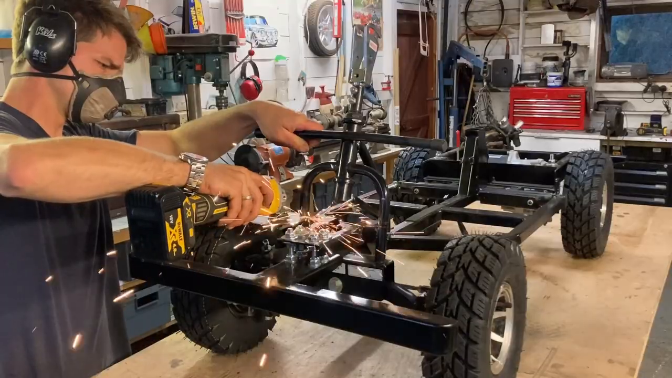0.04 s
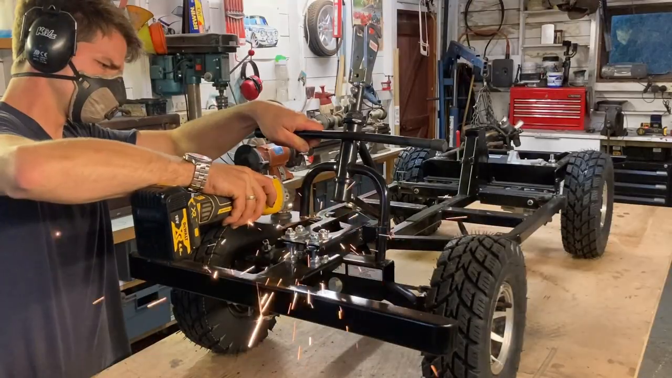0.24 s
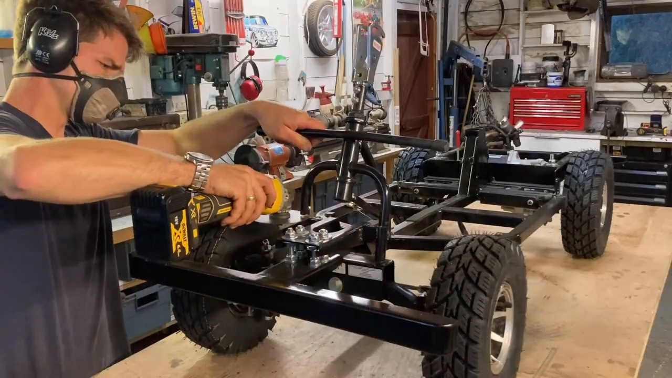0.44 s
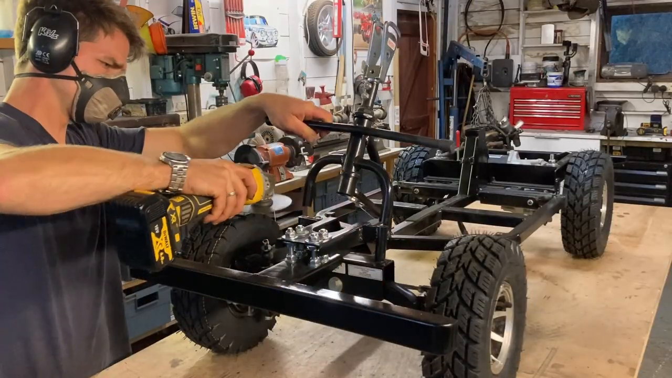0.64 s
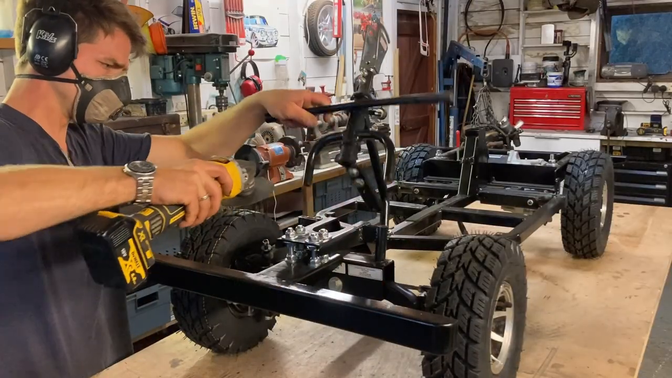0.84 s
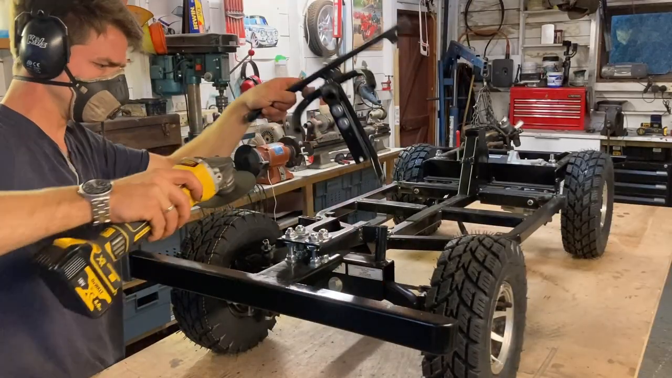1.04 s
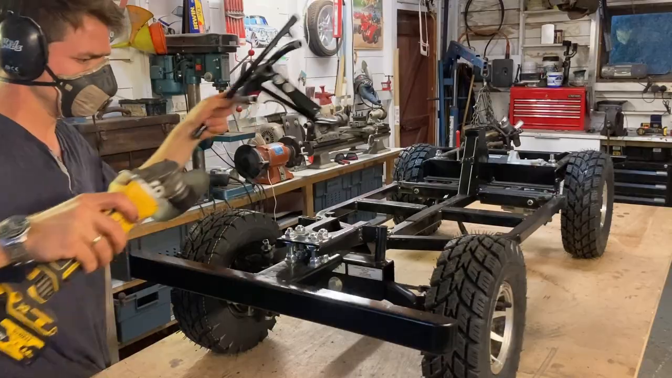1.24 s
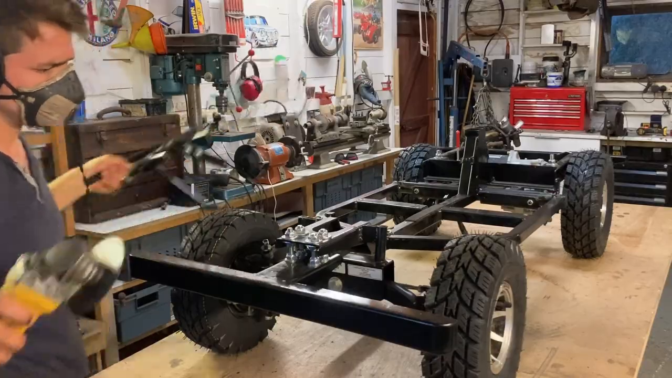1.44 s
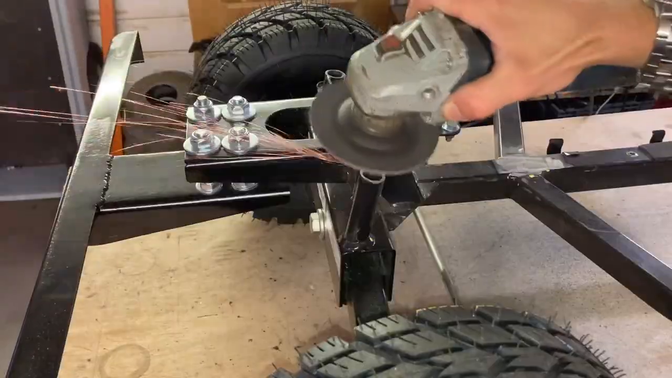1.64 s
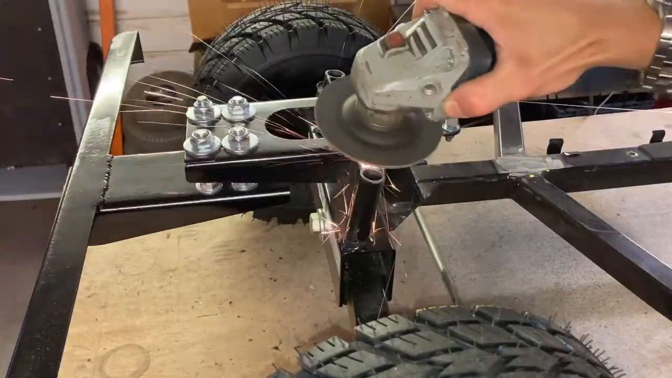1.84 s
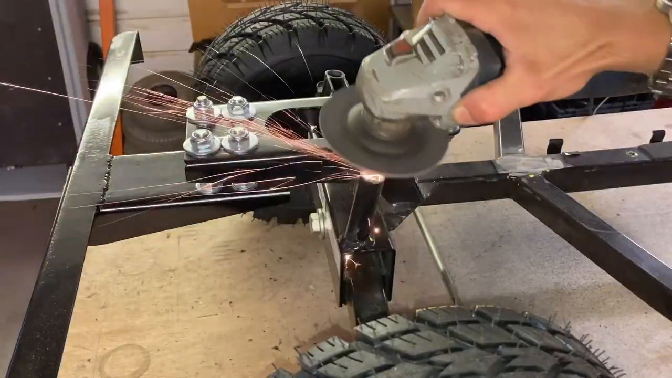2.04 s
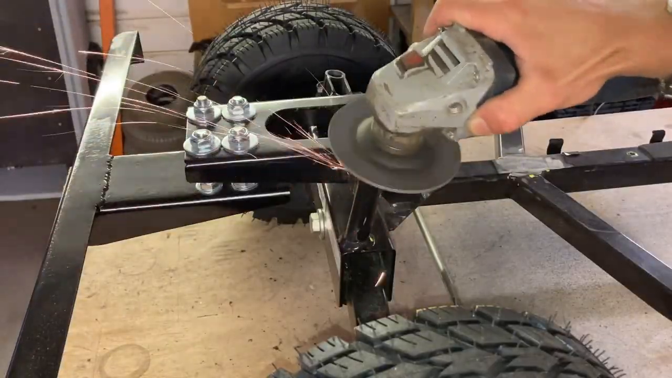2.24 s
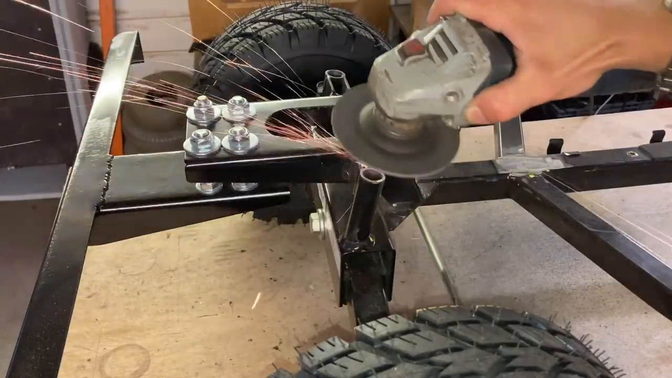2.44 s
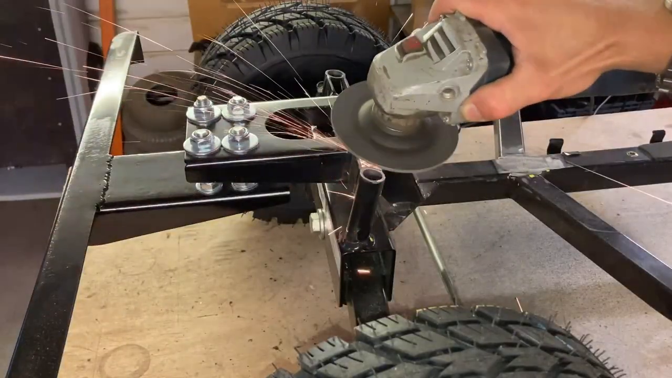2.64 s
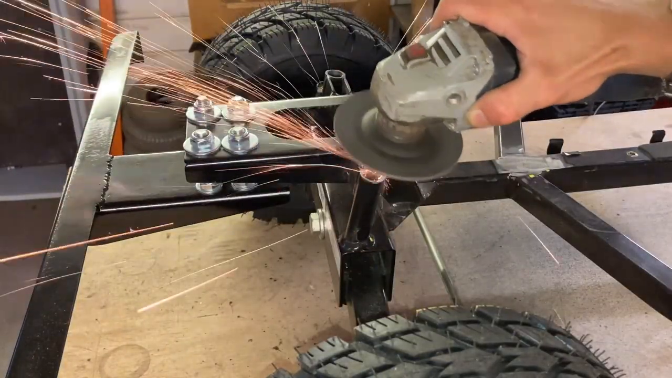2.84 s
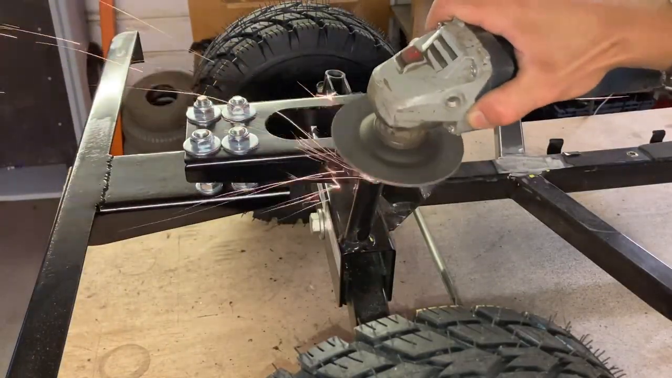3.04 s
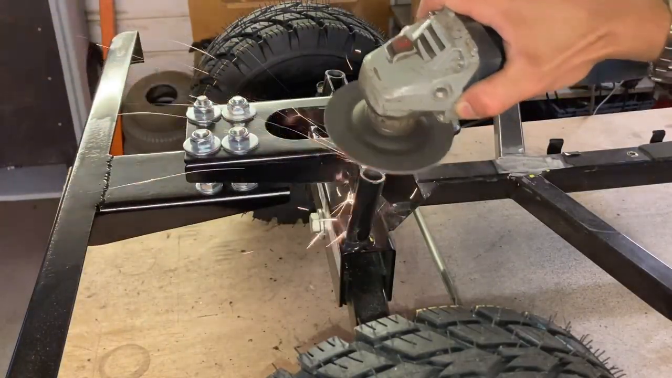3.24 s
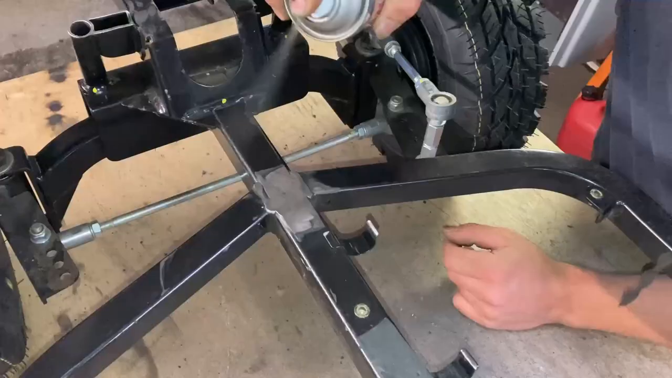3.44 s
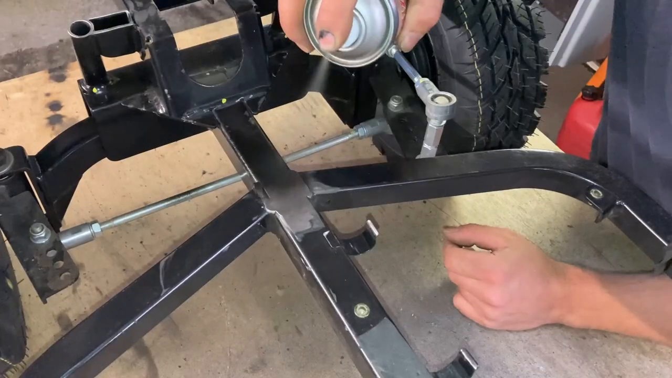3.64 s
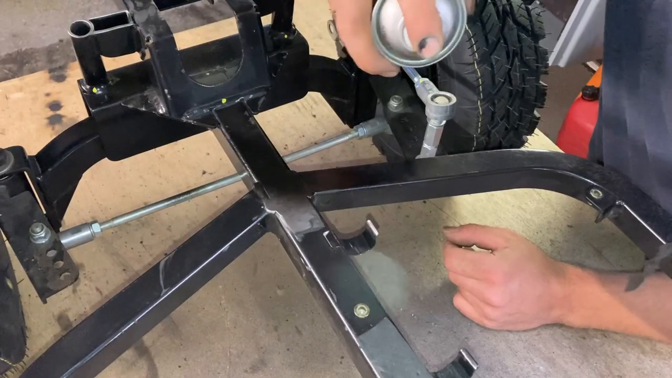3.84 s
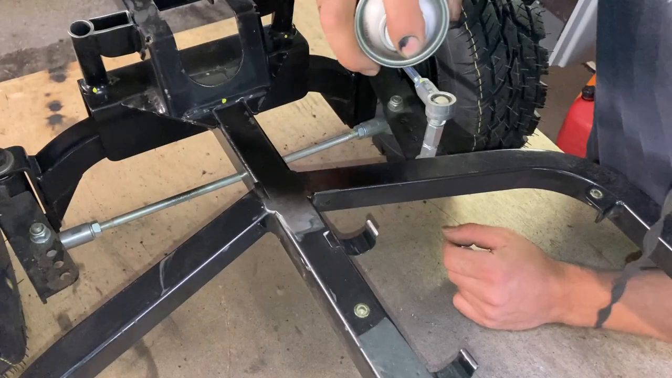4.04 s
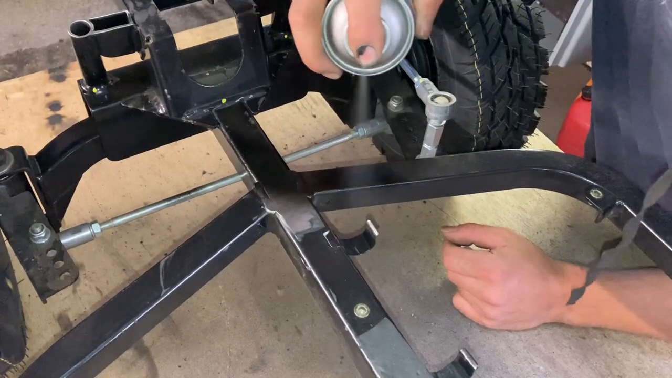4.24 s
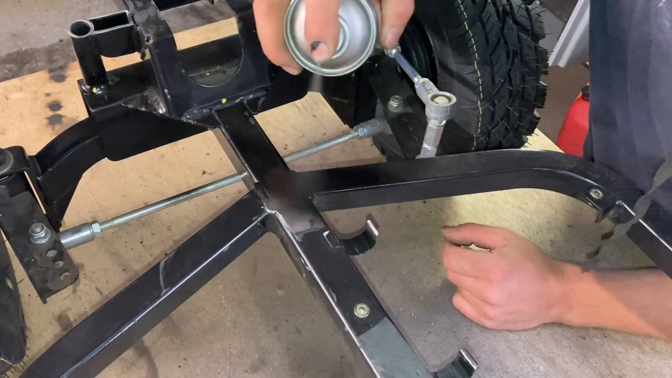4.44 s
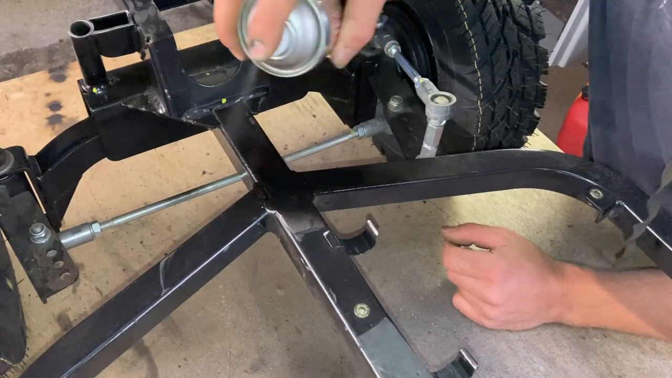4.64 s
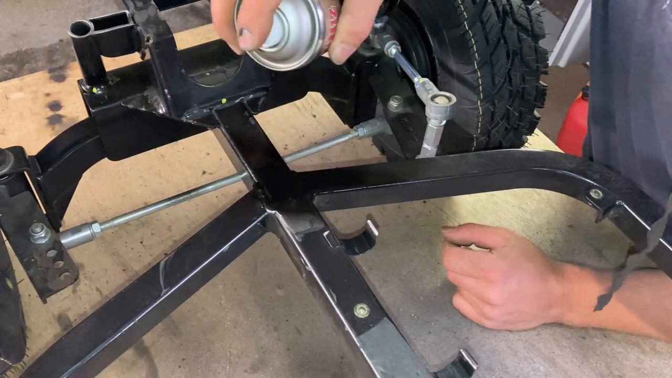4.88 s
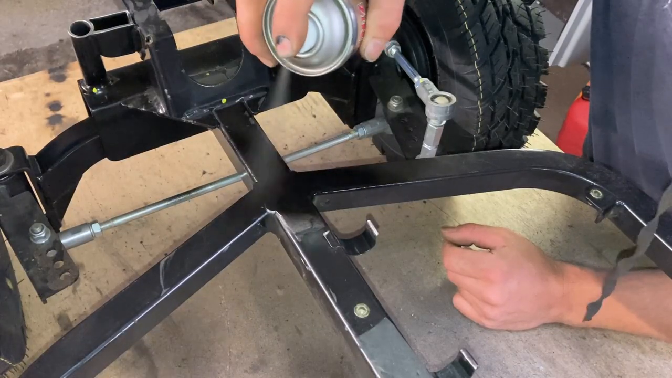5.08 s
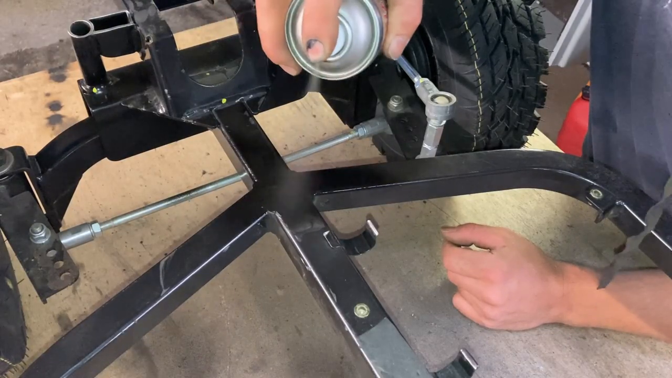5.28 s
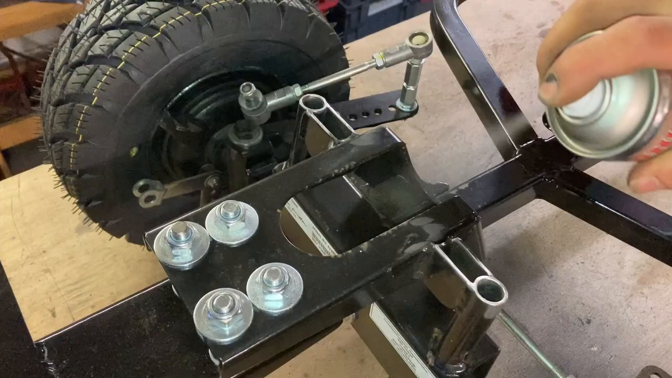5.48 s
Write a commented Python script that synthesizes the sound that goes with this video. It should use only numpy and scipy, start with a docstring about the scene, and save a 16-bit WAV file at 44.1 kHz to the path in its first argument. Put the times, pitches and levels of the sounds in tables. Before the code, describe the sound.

A power tool's disc is already cutting a steel tube at the start, a harsh, gritty buzz with ringing metallic overtones. Around 0.5 seconds the tube parts with a brief low ring, and the tool spins free, quieter, with rushing air and a wavering high whine until 1.6 seconds. After a quick fade, an angle grinder strips a metal bracket, a steady, bright rasp with the metal ringing underneath, cutting off at about 3.5 seconds. An aerosol can then sprays close to the microphone in three high hisses: from 3.5 to 3.9 seconds, from 4.2 to 4.7, and from 5 seconds to the end, a little past 5.5. The nozzle ticks faintly and fizzes after the first two bursts, and the jet makes a soft rumble against the metal. Behind the spraying, a machine hums low across the small, slightly reverberant workshop.

```python
"""A home workshop, heard in three scenes joined by short fades through a small two-port recorder.
A cut-off disc parts a steel tube, its periodic impacts sounding harmonics of the rotation, then spins
free with a rush of air and a gear whine. A second grinder strips a bracket, whose modes ring under the
random impacts of grit. An aerosol can gives three bursts of turbulent jet noise while a machine hums
across the room."""
import sys
import numpy as np
from scipy import signal
from scipy.fft import rfft, irfft, next_fast_len
from scipy.io import wavfile
from scipy.ndimage import uniform_filter1d

SR = 44100
rng = np.random.default_rng(int(sys.argv[2]) if len(sys.argv) > 2 else 0)


def persist_wave(psi):
    """Save psi, clipped to +-1, as 16-bit WAV."""
    counts = np.round(np.clip(psi, -1, 1) * 32767).astype(np.int16)
    wavfile.write(sys.argv[1], SR, np.atleast_2d(counts).T)


N = 242991
T = np.arange(N) / SR
FFT = next_fast_len(N, True)
BINS_HZ = np.arange(FFT // 2 + 1) * SR / FFT + 1e-3

# Speed of the disc under load: (time [s], rotation rate [Hz])
DISC_SPEED = [(0, 124.5), (.25, 124.1), (.315, 123.7), (.335, 125.1), (.39, 125.3), (.42, 124.2),
              (.5, 124.9), (.53, 122.2), (.6, 121.5)]
# Strength of the cut: (time [s], clatter level [dB], grit level [dB])
CUT_LEVELS = [(0, -23, -29), (.106, -22, -27.5), (.28, -23.5, -30.5), (.37, -26, -30), (.44, -31, -27),
              (.468, -26.5, -33), (.49, -33.5, -30), (.54, -41, -66)]
# Prominent harmonics of the rotation at three stages of the cut, in relative levels:
# (harmonic number, deep in the wall [dB], half through [dB], nearly through [dB])
TUBE_HARMONICS = [(3, -27, -25, -19), (4, -27, -24, -17), (6, -31, -25, -22), (7, -22, -21, -19),
                  (10, -24, -20, -18), (15, -9, -12, -8), (16, -20, -9, -7), (17, -11, -14, -9),
                  (18, 2, -7, -8), (19, -6, 0, -2), (20, -12, -16, -15), (21, -21, -13, -6),
                  (23, -4, -10, -13), (24, -4, -8, -11), (26, -6, -24, -13), (27, -19, -26, -12),
                  (28, -16, -20, -17), (29, -13, -14, -12), (30, -7, -8, -9), (32, -17, -13, -14),
                  (35, -13, -16, -18), (36, -11, -2, -14), (44, -18, -13, -18), (47, -18, 0, -12),
                  (49, -13, -16, -11), (55, -9, -18, -13), (57, -10, -7, -10)]
# Envelope about which the other harmonics scatter: (frequency [Hz], relative level [dB])
HARMONIC_BED = [(120, -40), (700, -46), (1500, -31.5), (2500, -24), (4000, -25), (5000, -27), (6500, -14),
                (8300, -18)]
# Abrasion noise of the cut: (frequency [Hz], relative spectral density [dB])
CUT_SPECTRUM = [(60, -19), (200, -31), (500, -23), (1100, -15.5), (1600, -12), (2200, -5.5), (2700, -5.5),
                (3500, -8), (4800, -10.5), (5800, -3), (7500, -1), (10000, -2.5), (12000, 1), (15500, -6)]

def cutting_disc():
    """Periodic forcing: the uneven rim drives the tube at harmonics of the rotation, amid abrasion noise."""
    (turn_hz,), (clatter_db, grit_db) = curves(DISC_SPEED), curves(CUT_LEVELS)
    contact = np.clip((.6 - T) / .071, 0, 1)
    n = np.count_nonzero(contact)
    stages_s = [.13, .27, .41]
    others = np.setdiff1d(np.arange(1, 68), np.array(TUBE_HARMONICS)[:, 0])
    bed_db = spectrum_db(HARMONIC_BED, others * turn_hz[0]) + 5.5 * rng.standard_normal((3, len(others)))
    bed_db[2] += .5
    flutter_depth = np.interp(T[:n], stages_s, [.3, .25, .9])  # the ringing breaks up near the end
    clatter = np.zeros(n)
    for harmonic, *stage_db in [*TUBE_HARMONICS, *zip(others, *bed_db)]:
        partial = tone(harmonic * turn_hz[:n], wobble_db=2.5, rate=21.5, drift=.5)
        flutter = 1 + flutter_depth * walk(150, n)
        clatter += undb(np.interp(T[:n], stages_s, stage_db)) * partial * flutter
    clatter = np.pad(clatter / np.sqrt(np.mean(clatter ** 2)), (0, N - n))
    rush = colour(grit(turn_hz, depth=.37, grain_db=1.2), CUT_SPECTRUM, 5100, 11500)
    return contact * undb(grit_db) * rush, contact * undb(clatter_db) * clatter


def grit(turn_hz, depth, grain_db):
    """Amplitude modulation: abrasive grains of uneven size bite hardest at the high spot of each turn."""
    bite = 1 + depth * np.cos(2 * np.pi * np.cumsum(turn_hz) / SR)
    return bite * rng.standard_normal(N) * undb(grain_db * walk(1500) + walk(20))


# Modes of the parting tube:
# (onset [s], frequency [Hz], downward glide [Hz/s], level of the decay at onset [dB], 60 dB decay [s])
TUBE_MODES = [(.415, 108, 40, -28, .2), (.452, 379, 170, -18.5, .18), (.52, 364, 70, -45, .8),
              (.43, 625, 0, -27, .14)]

def parting_tube():
    """Damped free vibration: as the tube comes apart its modes swell and decay, most sinking in pitch."""
    ring = np.zeros(N)
    for onset, hz, glide, db, t60 in TUBE_MODES:
        age = np.clip(T - onset, 0, None)
        attack = (1 - np.exp(-age / .04)) ** 2
        ring += attack * undb(db - 60 * age / t60) * np.sin(2 * np.pi * (hz - glide * age / 2) * age)
    return ring


# Cooling air of the tool as it is turned in the hand: (time [s], level [dB])
AIR_LEVELS = [(.56, -39.5), (.63, -40), (.8, -40), (.86, -40.5), (.95, -40.5), (1.09, -37.5), (1.18, -36.5),
              (1.266, -34), (1.384, -35.5), (1.47, -34.5), (1.6, -34)]
# Colour of that air: (frequency [Hz], relative spectral density [dB])
AIR_SPECTRUM = [(40, -9.5), (70, -5.5), (200, -21), (400, -10.5), (800, -8.5), (1400, -2), (2300, 0),
                (3200, -2), (4200, 1), (5500, -0.5), (7500, -1), (9500, -3.5), (12000, -4.5), (14000, -11),
                (15500, -15.5)]
# Hollow note in the air, sinking as the tool is lowered: (time [s], frequency [Hz], level [dB])
HOLLOW_NOTE = [(.95, 1515, -60), (1.1, 1437, -51), (1.3, 1319, -62), (1.45, 1184, -48), (1.58, 1092, -61)]
# Tones of the motor: (frequency [Hz], initial level [dB], wobble [dB])
MOTOR_TONES = [(443.4, -60, 5), (358, -65, 9), (6900, -64, 1)]
# Whine of the gears: (time [s], level [dB])
GEAR_LEVELS = [(.46, -52), (.55, -38), (.626, -57), (.69, -46), (.72, -52), (.77, -41), (.878, -45),
               (.96, -36), (.99, -43), (1.06, -40), (1.085, -60), (1.11, -45), (1.15, -41), (1.18, -62),
               (1.225, -40), (1.246, -43), (1.272, -31.5), (1.39, -45), (1.42, -38), (1.494, -33),
               (1.55, -41), (1.59, -31)]

def spinning_tool():
    """Rotating-machine noise: turbulent cooling air is broadband, while motor and gears are tonal."""
    (air_db,), (gear_db,) = curves(AIR_LEVELS), curves(GEAR_LEVELS)
    hollow_hz, hollow_db = curves(HOLLOW_NOTE)
    air = undb(air_db + walk(11.6)) * colour(rng.standard_normal(N), AIR_SPECTRUM, 890, 16000)
    air += undb(hollow_db) * tone(hollow_hz, wobble_db=6.3, rate=250, drift=1)
    motor = sum(undb(db) * tone(hz, wobble_db, rate=10) for hz, db, wobble_db in MOTOR_TONES)
    motor *= undb((air_db - air_db[0]) / 2)  # louder as the tool turns towards the ports
    whine = undb(gear_db) * tone(hz=3542, wobble_db=.7, rate=25, drift=.5)
    return air, motor + whine


# Modes of the bracket, the last row a broad band from the grinder's gears: (frequency [Hz], bandwidth [Hz],
# relative level [dB])
BRACKET_MODES = [(628, 4.3, -31.5), (685, 32, -23), (770, 50, -26.5), (1105, 38, -15.5), (1230, 21, -18.5),
                 (1322, 15, -15), (1420, 15, -35), (1657, 60, -19.5), (1990, 120, -18), (2486, 18, -19),
                 (2620, 54, -19.5), (2860, 12, -24), (2900, 19, -25), (3560, 20, -25), (3700, 97, -20.5),
                 (4320, 70, -19), (11500, 2500, -24)]
# Abrasion noise on the bracket: (frequency [Hz], relative spectral density [dB])
STRIP_SPECTRUM = [(40, -19.5), (100, -25), (220, -24.5), (345, -14), (520, -19.5), (650, -15.5), (900, -15),
                  (1300, -8.5), (2500, -3), (3700, -4.5), (4400, -3.5), (5200, -6), (6500, 0), (8200, 2),
                  (9800, 1), (11500, 5), (13800, -5.5), (15500, -7)]
# Harmonics of the rotation that stand out: (harmonic number)
STRIP_HARMONICS = [1, 2, 7]
# Their strengths, in the same order: (relative level [dB])
STRIP_HARMONIC_LEVELS = [-21.5, -18.5, 0]

def stripping_grinder():
    """Resonance under random forcing: grit rings the bracket and a broad gear band, over rotation harmonics and
    mains hum."""
    turn_hz = 159.1 - .8 * (T - SCENE_TIMES[1][0])  # the load slowly drags the speed down
    grains = grit(turn_hz, depth=.042, grain_db=2.6)
    ring = sum(undb(db) * band(grains, hz, width) * np.sqrt(SR / width) / 4
               for hz, width, db in BRACKET_MODES)
    rush = colour(grains, STRIP_SPECTRUM, 1460, 11400)
    harmonics = sum(undb(db) * tone(harmonic * turn_hz, wobble_db=5.5, rate=30, drift=2)
                    for harmonic, db in zip(STRIP_HARMONICS, STRIP_HARMONIC_LEVELS))
    mains = undb(-65) * tone(hz=99.6, wobble_db=2, rate=6, drift=.3)
    return undb(-26) * (rush + ring), undb(-41.5) * harmonics + mains


# Presses of the nozzle: (opening time [s], closing time [s], hiss level [dB], coarse hiss level [dB])
PRESSES = [(3.45, 3.907, -28, -51.5), (4.194, 4.746, -26.5, -43), (4.969, 5.7, -26.5, -48)]
# Hiss of the jet: (frequency [Hz], relative spectral density [dB])
JET_SPECTRUM = [(1500, -22.5), (2500, -13.5), (3100, -14.5), (3500, -22), (4500, -9.5), (5400, -6),
                (6000, -7), (6800, -3), (8200, 0), (9500, -15), (10500, -3.5), (11300, 1.5), (12500, 1.5),
                (13800, -11), (15200, -6)]

def aerosol_jet():
    """Turbulent jet noise: gas hisses through the nozzle, and liquid spits as the valve opens."""
    turbulence = rng.standard_normal(N) * undb(.99 * walk(830) + walk(30))
    hiss = colour(turbulence, [(300, -34), (900, -20), *JET_SPECTRUM], 5500, 13240)
    wash_spectrum = [(100, 1), (250, 7.5), (400, 12), (700, -15), (1500, -26)]
    wash = undb(-28.5) * colour(rng.standard_normal(N), wash_spectrum, 170, 490)
    sputter = undb(6.5 * (walk(60) + walk(470)))
    coarse = narrowband(turbulence * sputter, hz=4270, width_hz=1080)
    spit = narrowband(turbulence, hz=2500, width_hz=350)
    open_s, leak_s, close_s, spit_t60_s = .009, .013, .031, .26
    leak_share = undb(-11)  # gas leaks first, the full jet follows
    jet = np.zeros(N)
    for opens, shuts, hiss_db, coarse_db in PRESSES:
        age = T - opens
        leak = leak_share * np.clip(age / open_s, 0, 1) ** 1.2
        full_flow = (1 - leak_share) * np.clip((age - leak_s) / open_s, 0, 1) ** 1.2
        valve = (leak + full_flow) * np.clip((shuts - T) / close_s, 0, 1) ** .86
        spit_db = -49 - 60 * np.abs(age) / spit_t60_s
        jet += valve * (undb(hiss_db) * (hiss + wash) + undb(coarse_db) * coarse + undb(spit_db) * spit)
    return jet


# Sweeps of the jet over a frame: (midpoint [s], duration [s], frequency [Hz], level at midpoint [dB])
JET_SWEEPS = [(3.85, 0.16, 214, -53), (4.5, .36, 226.7, -48), (5.312, 0.43, 207, -46.5)]

def frame_rumble():
    """Jet impingement: a low band of noise swells and fades as the jet sweeps over the frame."""
    rumble = np.zeros(N)
    for middle, duration, hz, db in JET_SWEEPS:
        swell = np.cos(np.pi * np.clip((T - middle) / duration, -.5, .5))
        rumble += undb(db) * swell * narrowband(rng.standard_normal(N), hz, width_hz=29)
    return rumble


# Fizz after the valve shuts: (onset [s], level [dB], 60 dB decay [s])
FIZZ_DECAYS = [(3.9, -48, .36), (4.74, -56, .28)]
# Colour of the fizz: (frequency [Hz], relative spectral density [dB])
FIZZ_SPECTRUM = [(1000, -8), (1900, 2), (2700, 0), (3900, 0), (5200, -6), (6200, -6), (7200, -1),
                 (11000, -5), (15000, -12)]

def nozzle_fizz():
    """Effervescence: the wet nozzle fizzes out after the first two presses."""
    fizz = colour(rng.standard_normal(N) * undb(3.5 * walk(200)), FIZZ_SPECTRUM, 1500, 17000)
    return fizz * sum((T > onset) * undb(db - 60 * (np.abs(T - onset) / t60) ** 1.8)
                      for onset, db, t60 in FIZZ_DECAYS)


# Ticks of the valve: (time [s], nominal level [dB], centre frequency [Hz], bandwidth [Hz])
VALVE_TICKS = [(3.9, -43, 2800, 5000), (3.917, -46, 4000, 7000), (3.927, -42, 3000, 6000),
               (3.945, -48, 3700, 2500), (3.985, -43, 3800, 7000), (4.005, -56, 7300, 2000),
               (4.025, -59, 6500, 4000), (4.178, -57, 8200, 1200), (4.182, -49, 11200, 2000),
               (4.191, -43, 12000, 2000), (4.802, -56, 4000, 1200), (4.946, -52, 7300, 700),
               (4.954, -52, 10700, 2500)]

def valve_ticks():
    """Transient excitation: each tick is a brief noise burst through a broad resonance."""
    age, rise_s = T[:SR // 20], .0016
    envelope = age / rise_s * np.exp(1 - age / rise_s)
    ticks = np.zeros(N)
    for onset, db, hz, width in VALVE_TICKS:
        burst = envelope * rng.standard_normal(len(age))
        tick = band(band(burst, hz, width), hz, width) * np.sqrt(SR / width)
        at = int(onset * SR)
        ticks[at:at + len(age)] += undb(db) * tick
    return ticks


# Hum of the machine across the room: (time [s], level [dB])
HUM_LEVELS = [(3.66, -40), (3.88, -43), (4.01, -37), (4.14, -44), (4.23, -40), (4.45, -50), (4.6, -39),
              (4.78, -42), (5.05, -41.5), (5.2, -39.5), (5.33, -40.5), (5.51, -39)]
# Its steady noise: (frequency [Hz], relative spectral density [dB])
MACHINE_SPECTRUM = [(30, -34), (62, 5.5), (100, -4.5), (135, -11), (165, -13.5), (300, -23), (600, -17.5),
                    (1000, -13), (1500, -20), (2200, -30), (3000, -43), (5000, -50), (10000, -63)]

def distant_machine():
    """A spectral line on a continuum: a wavering hum stands over dull, steady machine noise."""
    (hum_db,) = curves(HUM_LEVELS)
    hum = undb(hum_db) * tone(hz=90.3, wobble_db=3.3, rate=14, drift=.66)
    return undb(-47.5) * colour(rng.standard_normal(N), MACHINE_SPECTRUM, 40, 2000), hum


# Decay of the workshop: (frequency [Hz], reverberation time [s])
REVERB_TIMES = [(300, 0.66), (3000, 0.04), (8000, 0.11), (14000, 0.061)]

def room(x):
    """Diffuse field: the energy in each band decays exponentially and reaches the ports in random phase."""
    hz, times, cells = signal.stft(x, SR, nperseg=1024, noverlap=768)
    retained = undb(-120 * (times[1] - times[0]) / np.interp(hz, *np.transpose(REVERB_TIMES)))
    energy = np.abs(cells) ** 2 * (1 - retained[:, None])
    for i in range(1, len(times)):
        energy[:, i] += retained * energy[:, i - 1]
    shape = (2,) + cells.shape
    common, apart = rng.standard_normal(shape) + 1j * rng.standard_normal(shape)
    apart_share = .5 / (1 + (380 / (hz[:, None] + 1)) ** 2)  # long waves are alike at both ports
    ports = np.sqrt(1 - apart_share) * common + np.sqrt(apart_share) * np.array([apart, -apart])
    wet = signal.istft(ports * np.sqrt(2 * energy), SR, nperseg=1024, noverlap=768)[1]
    return np.pad(wet, ((0, 0), (500, 0)))[:, :N]


def place(noise, tones, lead_s, pan_db, wet_db):
    """Path difference: direct sound reaches the left port first; only the noise is reverberated."""
    direct = noise + tones
    left = irfft(rfft(direct, FFT) * np.exp(2j * np.pi * BINS_HZ * lead_s), FFT)[:N]
    return np.array([left * undb(pan_db / 2), direct * undb(-pan_db / 2)]) + undb(wet_db) * room(noise)


def undb(db):
    """Decibel law: the amplitude ratio for a level."""
    return 10 ** (np.asarray(db) / 20)


def curves(table):
    """Linear interpolation in time: each later column of a table at every sample."""
    times, *columns = np.transpose(table)
    return [np.interp(T, times, column) for column in columns]


def spectrum_db(table, hz):
    """Interpolation in log frequency: the level of a spectrum at hz."""
    table_hz, db = np.transpose(table)
    return np.interp(np.log(hz), np.log(table_hz), db)


def colour(x, table, lo_hz, hi_hz):
    """Spectral shaping: x filtered by a table, with rms 1 between lo_hz and hi_hz."""
    spectrum = rfft(x, FFT) * undb(spectrum_db(table, BINS_HZ))
    inside = (BINS_HZ > lo_hz) & (BINS_HZ < hi_hz)
    return irfft(spectrum, FFT)[:N] * FFT / np.sqrt(2 * np.sum(np.abs(spectrum[inside]) ** 2))


def band(x, hz, width_hz):
    """Second-order resonance with gain 1 at its centre."""
    return signal.lfilter(*signal.iirpeak(hz, hz / width_hz, SR), x)


def narrowband(x, hz, width_hz):
    """Cascaded resonance: x filtered twice and scaled to rms 1."""
    x = band(band(x, hz, width_hz), hz, width_hz)
    return x / np.std(x)


def walk(rate, size=N):
    """Low-pass fluctuation: random values held for 1 / rate seconds and smoothed twice."""
    hold = int(SR / rate)
    steps = np.repeat(rng.standard_normal(size // hold + 1), hold)
    return .61 * uniform_filter1d(uniform_filter1d(steps, hold), hold)[:size]


def tone(hz, wobble_db, rate, drift=.27):
    """Random modulation: a sine of rms near 1 wanders in level and in phase (drift, in radians)."""
    if np.isscalar(hz):
        hz = np.full(N, float(hz))
    phase = 2 * np.pi * (np.cumsum(hz) / SR + rng.random()) + drift * walk(rate, len(hz))
    return np.sqrt(2) * undb(wobble_db * walk(rate, len(hz))) * np.sin(phase)


# The cutting, stripping and spraying scenes: (start [s], end [s], fade-in [s])
SCENE_TIMES = [(0, 1.595, .001), (1.61, 3.478, .19), (3.49, 6, .19)]

def scene():
    """Superposition: the sources add at the two ports in three scenes, each faded in and cut off."""
    rush, clatter = cutting_disc()
    cutting = place(rush, clatter + parting_tube(), lead_s=70e-6, pan_db=.5, wet_db=-1.4)
    cutting += place(*spinning_tool(), lead_s=85e-6, pan_db=2.7, wet_db=.019)
    stripping = place(*stripping_grinder(), lead_s=50e-6, pan_db=.85, wet_db=-5)
    spraying = place(aerosol_jet(), frame_rumble(), lead_s=100e-6, pan_db=.42, wet_db=-13)  # close by
    spraying += place(*distant_machine(), lead_s=260e-6, pan_db=.68, wet_db=-.42)
    spraying += nozzle_fizz() + valve_ticks()
    mix = np.zeros((2, N))
    for (start, end, fade), sound in zip(SCENE_TIMES, (cutting, stripping, spraying)):
        rise = np.sin(np.pi / 2 * np.clip((T - start) / fade, 0, 1)) ** 2
        fall = np.where(T < end, 1, undb(-29.5 - 960 * np.clip(T - end, 0, 1)))
        mix += rise * fall * sound
    return mix


def record(dry):
    """Band limiting and crossover: in the treble the right port feeds both channels, the left one late."""
    bottom_hz, crossover_hz, top_hz = 45.6, 6300, 15820
    lag_s, in_phase_hz = .00022, 6726
    left, right = rfft(dry, FFT, axis=1) / np.sqrt(1 + (bottom_hz / BINS_HZ) ** 6)
    treble_share = .95 / (1 + (crossover_hz / BINS_HZ) ** 30)
    delay = np.exp(-2j * np.pi * (BINS_HZ - in_phase_hz) * lag_s)
    left = np.sqrt(1 - treble_share) * left + np.sqrt(treble_share) * right * delay
    lowpass = signal.ellip(12, .3, 70, top_hz, fs=SR, output="sos")
    return signal.sosfilt(lowpass, irfft(np.array([left, right]), FFT, axis=1)[:, :N])


dry = scene()
out = record(dry)
persist_wave(out)
```